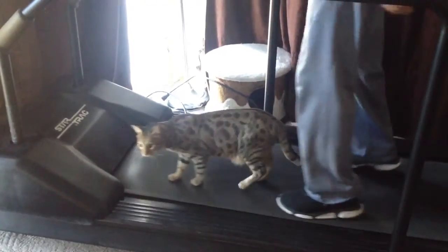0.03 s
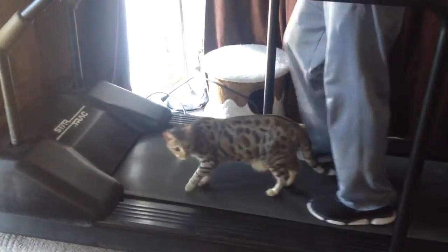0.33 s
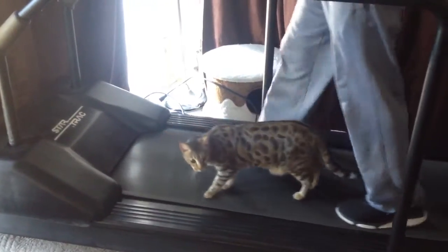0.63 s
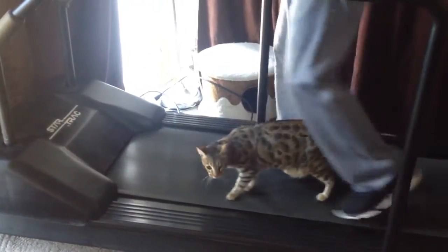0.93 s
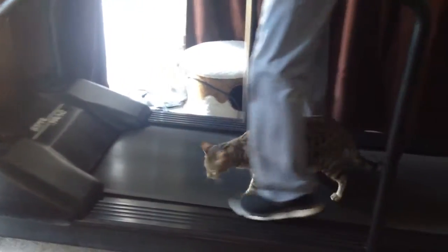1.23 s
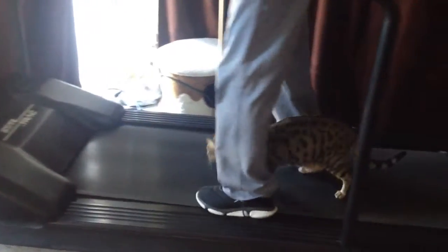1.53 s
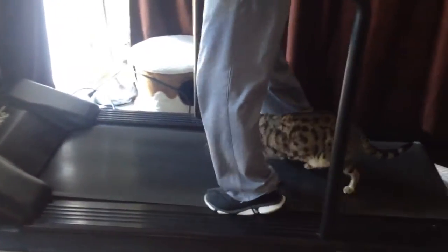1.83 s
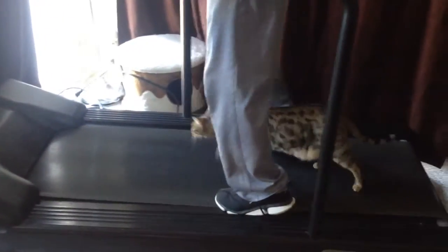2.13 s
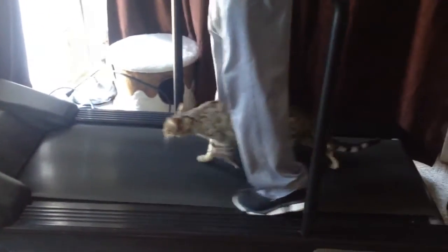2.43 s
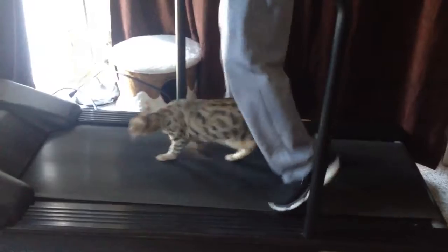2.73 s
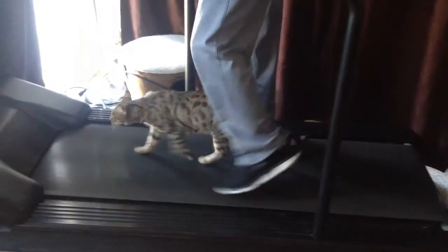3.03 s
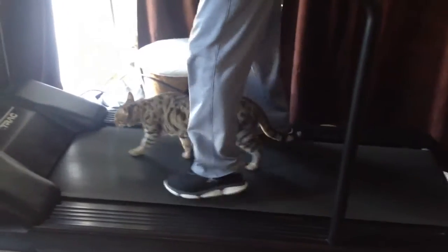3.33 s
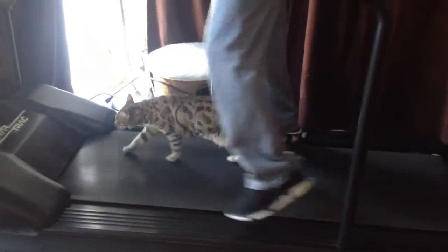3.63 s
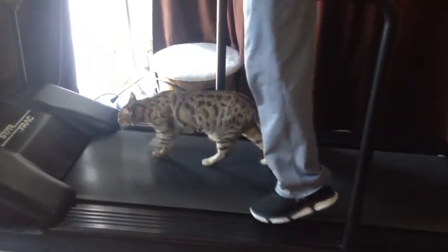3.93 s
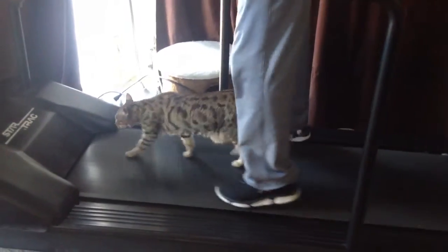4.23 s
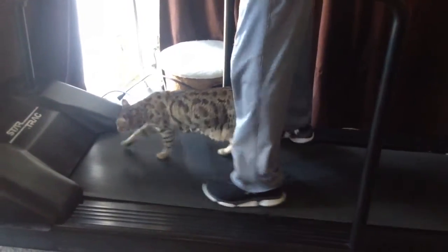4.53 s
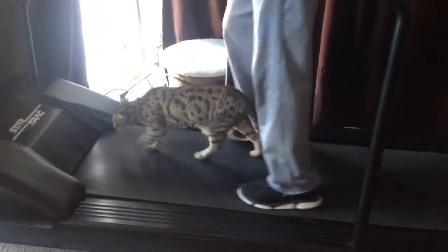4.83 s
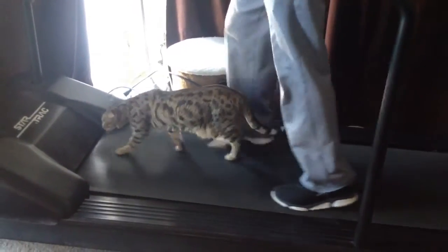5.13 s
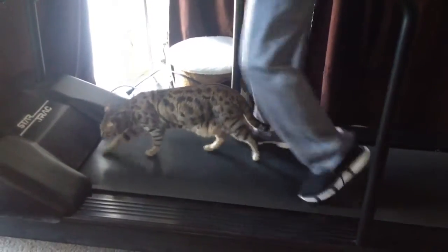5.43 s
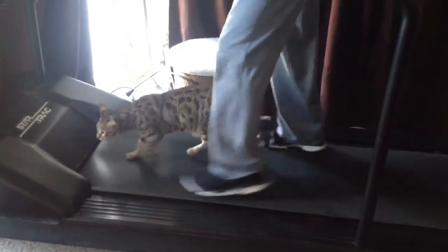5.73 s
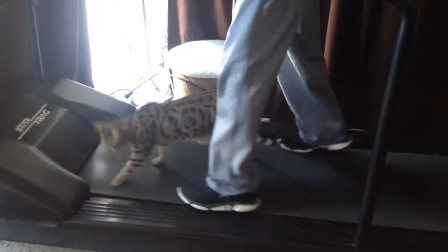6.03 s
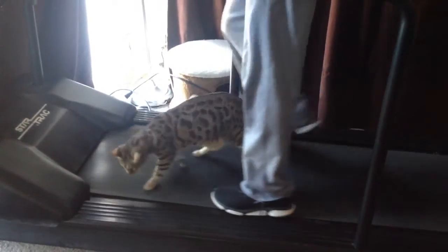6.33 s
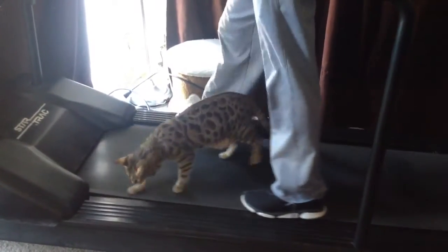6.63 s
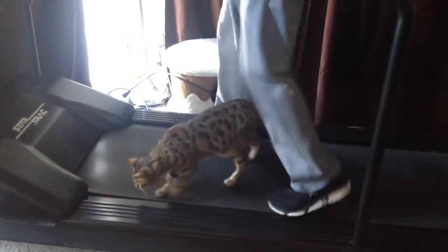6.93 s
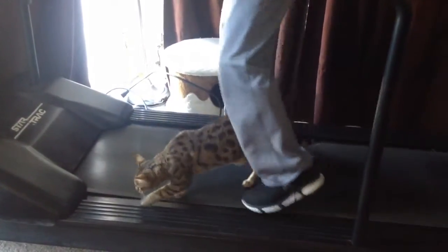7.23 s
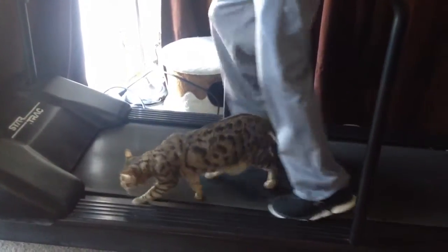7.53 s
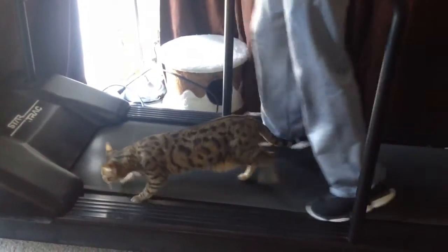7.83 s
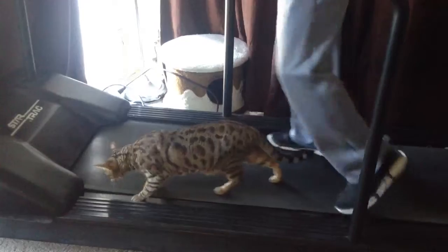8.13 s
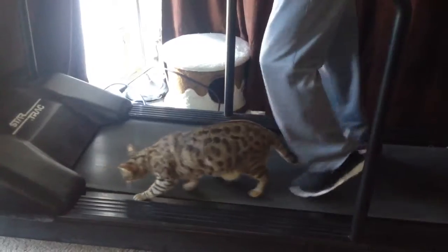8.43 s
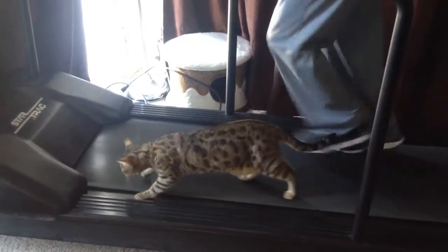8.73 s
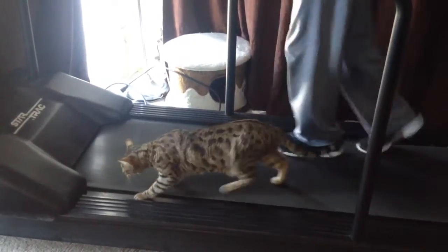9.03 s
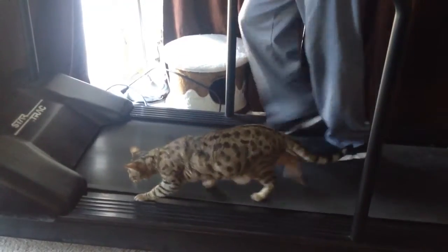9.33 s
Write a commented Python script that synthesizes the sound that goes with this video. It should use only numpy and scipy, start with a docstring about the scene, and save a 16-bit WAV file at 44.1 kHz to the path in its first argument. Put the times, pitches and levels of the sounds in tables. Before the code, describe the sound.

A treadmill runs slowly in a small room with a fluttering low hum, a roller groaning on every turn and a hissing belt. A walker's shoes thud, knock and scuff unevenly on the deck, and the roller briefly labours under the weight. Midway the hiss sinks and only soft swishes pass. The steps return, the heaviest one lands, and the roller drags again before the walk goes on. One small microphone hears it.

```python
"""A person walks on a slow treadmill in a small room, with a cat whose paws go unheard.
From the start a low hum near 256 Hz swells and flutters, a roller groans into the deck once a turn and
the belt hisses over it. Shoes thud, knock and scuff from 0.6 s; at 2 s the roller labours under the
walker's weight. Around 4 s the hiss sinks and only soft swishes pass. The steps return at 5.2 s, the
heaviest lands at 6.8 s, the roller labours again and the walk goes on. One small microphone hears it."""
import sys
import numpy as np
from scipy import signal
from scipy.fft import rfft, irfft
from scipy.io import wavfile

SR = 44100
rng = np.random.default_rng(int(sys.argv[2]) if len(sys.argv) > 2 else 0)


def unload_audio(sound):
    """Save the sound as a 16-bit wav file, at the path given as the first command line argument."""
    columns = np.transpose(np.atleast_2d(sound))
    # keep every value between -1 and 1, then stretch to whole-number steps
    steps = np.round(np.clip(columns, -1, 1) * 32767)
    wavfile.write(sys.argv[1], SR, steps.astype(np.int16))


N = 418509
TIME = np.arange(N) / SR


def amp(db):
    """Decibels to gain."""
    return 10 ** (np.asarray(db) / 20)


def unit_rms(x):
    """Scales to an rms of 1."""
    return x / np.sqrt(np.mean(x ** 2) + 1e-20)


def unit_energy(x):
    """Scales to an energy of 1."""
    return x / np.sqrt(np.sum(x ** 2) + 1e-20)


def curve_at(points, hz):
    """Reads a curve on a log-frequency axis."""
    point_hz, value = np.transpose(points)
    return np.interp(np.log(hz + 1), np.log(point_hz), value)


def automation(rows):
    """Draws each column of a timed table as a lane with one value a sample."""
    times, *columns = np.transpose(rows)
    return [np.interp(TIME, times, column) for column in columns]


def add(mix, start_s, sound):
    """Mixes a sound in at a time."""
    part = mix[max(round(start_s * SR), 0):][:len(sound)]
    part += sound[:len(part)]


def noise(eq):
    """Steady noise coloured by an EQ curve, rms 1."""
    gain = amp(curve_at(eq, np.fft.rfftfreq(N, 1 / SR)))
    return unit_rms(irfft(rfft(rng.standard_normal(N)) * gain, N))


def wander(rate_hz):
    """Smooth random modulation up to a rate, rms 1."""
    hz = np.fft.rfftfreq(N, 1 / SR)
    return unit_rms(irfft(rfft(rng.standard_normal(N)) / (1 + (hz / rate_hz) ** 2) ** 2, N))


def click(eq, size=4096):
    """The tightest (minimum-phase) click with a given EQ curve."""
    log_gain = np.log(amp(curve_at(eq, abs(np.fft.fftfreq(size, 1 / SR)))))
    spectrum = np.exp(np.conj(signal.hilbert(log_gain)))
    return unit_energy(np.fft.ifft(spectrum).real[:size // 2])


# The roller's pace, sagging twice under the walker's weight: (time [s], speed [turns/s])
ROLLER_SPEED = [(0.0, 4.42), (1.75, 4.7), (2.0, 3.38), (2.45, 4.64), (3.5, 5.33), (4.9, 4.94), (6.9, 4.94),
                (7.1, 2.58), (7.65, 5.23), (8.8, 5.61), (9.49, 4.87)]

def roller_motion(usual_speed=4.9, start_turn=.61):
    """The roller's speed above its usual pace in turns/s, and its running count of turns."""
    speed, = automation(ROLLER_SPEED)
    return speed - usual_speed, start_turn + np.cumsum(speed) / SR


def drive_whir(level_db=-73, throb_db=5):
    """The drive sings faintly and fitfully in three narrow resonances of its housing."""
    whir = 0
    for hz, db in [(2170, -5), (2580, 0), (3330, -3)]:
        peak_eq = [(hz - 500, -70), (hz - 130, -12), (hz, 0), (hz + 130, -12), (hz + 500, -70)]
        whir += amp(db) * unit_rms(noise(peak_eq) * amp(throb_db * wander(14)))
    return amp(level_db) * unit_rms(whir)


# The deck's resonances and how strongly each source drives them:
# (pitch [Hz], bandwidth [Hz], rolling gain [dB], groan gain [dB], shoe gain [dB])
DECK_MODES = [(116.4, 15, -9, -33, -1.5), (138, 11.8, -6.5, -35, -3), (149.2, 13.4, 1, -25, 2.5),
              (178.4, 14, -1.5, -32, 2.5), (193.3, 9, -5, -12, -22), (211.2, 17, -1.5, 8, 3),
              (234.3, 9.4, 1.5, 7.5, -12), (254, 19, 1.5, -22, 2.5), (292, 4.9, -5, -2.5, 4),
              (306.7, 6.1, 0, -7, -12), (329, 9.2, -3.5, 5.5, -6), (334.2, 18, -17, 1.5, -11.5),
              (358.2, 10, -4, 5, -1), (406.3, 12.5, -17, -2, 0.5), (466, 11.3, -2.5, 8.5, 4.5),
              (500, 60, -10.5, -24, 0.5), (521, 12, -10.5, -23, -3), (564.5, 8.4, -19, -31, -7)]

def deck_ring(driven_by):
    """The deck's modes die away, each as strong as the place of excitation makes it."""
    t = np.arange(SR // 2) / SR
    ring = 0
    for k, (hz, width, rolling_db, groan_db, shoe_db) in enumerate(DECK_MODES):
        db = {"rolling": rolling_db, "groan": groan_db, "shoe": shoe_db}[driven_by]
        gain = (-1) ** k * amp(db) * np.sqrt(width)  # neighbours swing opposite ways
        ring += gain * np.exp(-np.pi * width * t) * np.sin(2 * np.pi * hz * t)
    # the board radiates little bass, and the belt damps its treble
    band = signal.butter(4, [120, 600], "band", fs=SR, output="sos")
    return unit_energy(signal.sosfilt(band, ring))


# Tone of the bed of air: (frequency [Hz], gain [dB])
AIR_EQ = [(20, -32), (42, -30), (54, -5), (68, -23), (90, -11), (130, -5.5), (300, 7.5), (520, -0.5),
          (620, -5), (1100, -6), (1500, -9), (3000, -11.5), (8000, -46)]

def deck_rumble(level_db=-58.5, db_per_speed=2.5, air_db=-65):
    """The rolling belt shakes the deck at random, harder the faster it runs, over a soft wash of air."""
    faster, _ = roller_motion()
    shaken = signal.oaconvolve(rng.standard_normal(N + SR), deck_ring("rolling"))[SR:SR + N]
    return amp(level_db + db_per_speed * faster) * unit_rms(shaken) + amp(air_db) * noise(AIR_EQ)


# Fader ride of the low hum, swelling and sinking: (time [s], level [dB])
HUM_FADER = [(0.0, -59), (0.15, -69), (0.45, -51.0), (0.96, -63), (1.22, -53.0), (1.5, -54), (1.89, -65.0),
             (2.02, -54.0), (2.15, -62.5), (2.66, -55.5), (3.05, -71.5), (3.39, -52.0), (3.6, -61.5),
             (4.55, -57.5), (5.05, -63.5), (5.55, -55), (5.75, -61.5), (5.98, -50), (6.27, -65.5),
             (6.46, -50.5), (6.62, -59), (7.25, -67), (7.7, -53.5), (7.98, -58.0), (8.27, -53.0),
             (8.42, -60.5), (8.57, -52), (8.76, -61), (9.48, -57.5)]

def low_hum(usual_hz=255.7, hz_per_speed=2.51, drift_hz=3.48, jitter_hz=3, throb_db=2.8, flutter=0.34):
    """A low hum near 256 Hz swells and flutters; its pitch dips slightly when the roller slows."""
    level_db, = automation(HUM_FADER)
    faster, _ = roller_motion()
    hz = usual_hz + hz_per_speed * faster + drift_hz * wander(4.98) + jitter_hz * wander(23.4)
    tone = np.sqrt(2) * np.sin(2 * np.pi * np.cumsum(hz) / SR)
    swell = amp(level_db + throb_db * wander(16.6))
    return swell * unit_rms(1 + flutter * wander(30)) * tone


# Tone of the grit in the roller's groan: (frequency [Hz], gain [dB])
GRIT_EQ = [(90, -51), (170, -8), (260, 5.5), (360, 2.5), (410, -4), (470, 0), (540, -16), (900, -50)]

def roller_groan(gain_db=-53.5, db_per_speed=-1.5, spread_db=1.5, low_hz=268, high_hz=372,
                 hz_per_speed=18, length_s=0.085, lead_s=.05, uneven=.3, grit=0.63, ring_gain=0.93):
    """Once a turn the roller rubs and rings the deck: a rising groan, lower and louder as it labours."""
    faster, turns = roller_motion()
    rubs = np.flatnonzero(np.diff(np.floor(turns)))
    force, pressure = np.zeros((2, N))
    for at, (stretch, reach, phase, press) in zip(rubs, rng.uniform(-1, 1, (len(rubs), 4))):
        progress = np.linspace(0, 1, round(length_s * (1 + uneven * stretch) * SR))
        swell = amp(db_per_speed * faster[at] + spread_db * press) * np.sin(np.pi * progress ** 0.81)
        rise_hz = (high_hz + hz_per_speed * faster[at] - low_hz) * (1 + 2 * uneven * reach)
        cycles = np.cumsum(low_hz + rise_hz * progress) / SR
        add(force, at / SR - lead_s, swell * np.sqrt(2) * np.sin(2 * np.pi * (cycles + phase)))
        add(pressure, at / SR - lead_s, swell)
    force += grit * pressure * noise(GRIT_EQ)
    ring = unit_rms(signal.oaconvolve(force, deck_ring("groan"))[:N])
    return amp(gain_db) * np.std(force) * unit_rms(ring_gain * ring + unit_rms(force))


# Fader rides of the dragging belt, before trim: (time [s], hiss level [dB], fizz level [dB])
BELT_FADERS = [(0.0, -54, -63.5), (0.55, -50.0, -60.5), (0.98, -56, -67), (1.18, -52, -69),
               (1.48, -60.5, -68), (1.68, -54.0, -68), (2.2, -59, -69.5), (2.55, -57, -67.5),
               (2.9, -62.5, -72.5), (3.8, -62, -73), (4.2, -59.5, -72.0), (4.35, -63.5, -75.5),
               (4.75, -54.5, -61.5), (5.15, -53.0, -65.0), (6.05, -51, -62.5), (6.25, -56, -64.5),
               (6.75, -50.5, -64.5), (7.12, -57.5, -71), (7.4, -58, -67.0), (7.55, -52.0, -64.5),
               (7.75, -59, -69), (8.05, -52.5, -64.0), (9.05, -52, -63.0), (9.48, -54.5, -64.0)]
# Tones of its bright hiss, fine top fizz and coarse midrange rub: (frequency [Hz], gain [dB])
HISS_EQ = [(1500, -50), (3000, -11), (4000, -10), (4700, -5), (5250, -4), (5600, 3), (5900, 5), (6300, 0.5),
           (7000, -6), (8000, -13.5), (9500, -26), (15500, -20)]
FIZZ_EQ = [(4000, -14), (7000, -3), (9000, -2), (10700, -.5), (12300, 0), (13400, 3.5), (14300, -.5),
           (15500, -3)]
RUB_EQ = [(400, -23), (700, -0.5), (1000, -6), (1400, -3), (1800, 1.5), (2500, 2), (3300, -1), (4200, -1),
          (6000, -5.5), (9000, -44)]

def belt_friction(hiss_trim_db=1, fizz_trim_db=2, usual_hiss_db=-53, usual_rub_db=-62,
                  flicker_db=1.07, sway_db=0.03, sway_lag_turns=0.96):
    """Sliding friction, louder and brighter where weight presses the belt on the deck."""
    hiss_db, fizz_db = automation(BELT_FADERS)
    rub_db = usual_rub_db + 0.5 * (hiss_db - usual_hiss_db)  # the rub grows less than the hiss
    _, turns = roller_motion()
    sway = np.cos(2 * np.pi * (turns - sway_lag_turns))  # the belt tightens and slackens each turn
    grip = amp(flicker_db * wander(18) + sway_db * sway)
    hiss = amp(hiss_db + hiss_trim_db) * noise(HISS_EQ)
    rub = amp(rub_db) * noise(RUB_EQ)
    fizz = amp(fizz_db + fizz_trim_db) * noise(FIZZ_EQ)
    return grip * (hiss + rub) + fizz


# The small room's reverb on the footwork: (frequency [Hz], time to fall by 60 dB [s])
ROOM_DECAY = [(150, .36), (500, 0.51), (2000, 0.52), (6000, 0.39), (14000, 0.046)]

def room_response(direct_db=-3.5, bounce_s=.0032, bounce_loss_db=8, scatter_t60_s=.1, tail_db=-7.5):
    """Direct sound, a bounce off the deck, scatter from the frame and furniture, then the room's tail."""
    t = np.arange(SR // 2) / SR
    scatter, late = rng.standard_normal((2, len(t))) * (t > bounce_s)
    hz, frame_s, bands = signal.stft(late, SR, nperseg=256)
    decay = amp(-60 * frame_s / curve_at(ROOM_DECAY, hz)[:, None])
    tail = signal.istft(bands * decay, SR, nperseg=256)[1][:len(t)]
    response = unit_energy(scatter * amp(-60 * t / scatter_t60_s)) + amp(tail_db) * unit_energy(tail)
    response[0] += amp(direct_db)
    response[round(bounce_s * SR)] += amp(direct_db - bounce_loss_db)
    return response


def spot_ring(hz, least_width_hz=75, damping_hz=15000):
    """The struck spot rings briefly; its damping grows with the square of the pitch."""
    quality = hz / (least_width_hz + hz ** 2 / damping_hz)
    return signal.lfilter(*signal.iirpeak(hz, quality, fs=SR), signal.unit_impulse(SR // 8))


# Tones of a step's layers, deck thud, frame knock and sharp tick: (frequency [Hz], gain [dB])
THUD_EQ = [(50, -75), (90, -38), (140, -11), (300, 2.5), (520, -2.5), (700, -25), (1200, -7.5),
           (3000, -48.5)]
KNOCK_EQ = [(60, -72), (200, -13), (500, -12), (720, -2.5), (1100, 1), (1400, 0), (1750, 2), (2450, -1.5),
            (3000, -1.5), (4000, -8.5), (7000, -31.5)]
TICK_EQ = [(100, -82), (800, -15), (2000, -4), (3500, -0.5), (4300, -1.5), (5100, 0.5), (5900, 9.5),
           (6600, 1.5), (8000, -11.5), (10000, -20.5), (13400, -13.5), (16000, -29)]

def shoe_contact(contact_ms, thud_db, knock_db, tick_db, spot_hz, spot_db, diffuse_gain=0.49, span_s=.04):
    """A shoe pushes the deck, knocks the frame, ticks and rings the struck spot; long contacts scuff."""
    t = np.arange(SR // 8) / SR
    contact_s = contact_ms / 1000
    if contact_ms < .5:  # hard: one clean snap
        force = signal.unit_impulse(len(t))
    else:  # soft: a burst of tiny slips
        force = rng.standard_normal(len(t)) * t * np.exp(-t / contact_s)
    in_room = signal.fftconvolve(force, room_response())
    thud = diffuse_gain * unit_energy(signal.fftconvolve(in_room, click(THUD_EQ)))
    add(thud, 0, unit_energy(signal.fftconvolve(force, deck_ring("shoe"))))
    knock = signal.fftconvolve(in_room, click(KNOCK_EQ))
    tick = signal.fftconvolve(in_room, click(TICK_EQ))
    spot = signal.fftconvolve(in_room, spot_ring(spot_hz))
    out = np.zeros(SR)
    for layer, db in [(thud, thud_db), (knock, knock_db), (tick, tick_db), (spot, spot_db)]:
        # each level sets the energy of the layer's attack, as if spread over span_s
        attack = layer[:round((span_s + 2 * contact_s) * SR)]
        add(out, 0, amp(db) * layer * np.sqrt(span_s * SR / np.sum(attack ** 2)))
    return out


# Cues for the light brushes: (time [s], contact time [ms], base level [dB])
SWISH_CUES = [(.88, 1.8, -68), (1.153, 2.8, -63), (2.03, 12, -59), (4.145, 11, -69), (4.468, 5.3, -66),
              (6.215, 13, -59)]

def swishes(cloth_hz=11300):
    """A shoe or trouser leg brushes past, mostly treble."""
    out = np.zeros(N)
    for start_s, contact_ms, db in SWISH_CUES:
        add(out, start_s, shoe_contact(contact_ms, thud_db=db - 9, knock_db=db - 3, tick_db=db + 6,
                                       spot_hz=cloth_hz, spot_db=db - 2))
    return out


# Cues for the soft steps: (time [s], contact time [ms], thud and slap level [dB], slap pitch [Hz])
TREAD_CUES = [(.575, 3.7, -64, 860), (1.44, 13, -58.5, 504), (1.544, 11, -55, 496), (2.411, 4.7, -56, 420),
              (3.197, 12, -59.5, 477), (5.16, 1.1, -54.5, 930), (5.94, 1, -57, 820), (5.987, 1, -60, 800),
              (6.683, 3.4, -58.5, 545), (6.832, 7.5, -47, 465), (7.308, 5.7, -56.5, 600),
              (7.8885, 1.1, -59.5, 586)]

def sole_treads():
    """A sole lands flat and soft on the belt, mostly thud and slap."""
    out = np.zeros(N)
    for start_s, contact_ms, db, slap_hz in TREAD_CUES:
        add(out, start_s, shoe_contact(contact_ms, thud_db=db, knock_db=db - 14, tick_db=db - 15,
                                       spot_hz=slap_hz, spot_db=db))
    return out


# Cues for the knocks:
# (time [s], contact time [ms], deck thud [dB], frame knock [dB], sharp tick [dB], rail ring [dB])
KNOCK_CUES = [(0.607, 1.1, -51.5, -53.5, -70, -55), (1.1261, .3, -75, -73, -50, -60),
              (1.506, 4.5, -56, -57, -63, -76), (1.5342, .1, -60, -49.5, -42.5, -53.5),
              (2.28, 8, -79, -61, -72, -72), (2.646, 1.5, -57, -55, -65, -86),
              (2.9335, .24, -61, -58.5, -66, -68), (3.1211, .1, -65, -49.5, -41, -76),
              (3.189, 2.1, -56, -48, -50, -65), (5.1591, 0.5, -49, -55.5, -65, -70),
              (5.6956, .1, -60, -51.5, -42, -63), (5.987, .7, -64, -55.5, -60, -77),
              (6.824, .3, -42, -52, -55, -54.5), (7.193, 1.1, -70, -57.5, -49, -70),
              (7.258, 3.1, -64, -53.5, -69, -75), (8.344, 2.2, -70, -57.5, -53.5, -72),
              (8.8854, .1, -60, -53.5, -39, -45), (9.0082, 2.1, -61, -55, -48.5, -66)]

def shoe_knocks(rail_hz=2210):
    """A shoe knocks on the deck and frame and rings the side rail."""
    out = np.zeros(N)
    for start_s, contact_ms, thud_db, knock_db, tick_db, rail_db in KNOCK_CUES:
        add(out, start_s, shoe_contact(contact_ms, thud_db, knock_db, tick_db, rail_hz, rail_db))
    return out


def scene():
    """The machine bed with the footwork on top, the same in both channels."""
    machine = low_hum() + roller_groan() + deck_rumble() + belt_friction() + drive_whir()
    mono = machine + shoe_knocks() + sole_treads() + swishes()
    return np.array([mono, mono])


def record(dry, low_cut_hz=42, high_cut_hz=15350):
    """The small microphone loses deep bass, and the recorder's band limit shaves off the very top."""
    thin = signal.sosfilt(signal.butter(4, low_cut_hz, "high", fs=SR, output="sos"), dry)
    high_cut = signal.firwin(1023, high_cut_hz, window=("kaiser", 8), fs=SR)
    return signal.oaconvolve(thin, high_cut[None], "same")


dry = scene()
out = record(dry)
unload_audio(out)
```